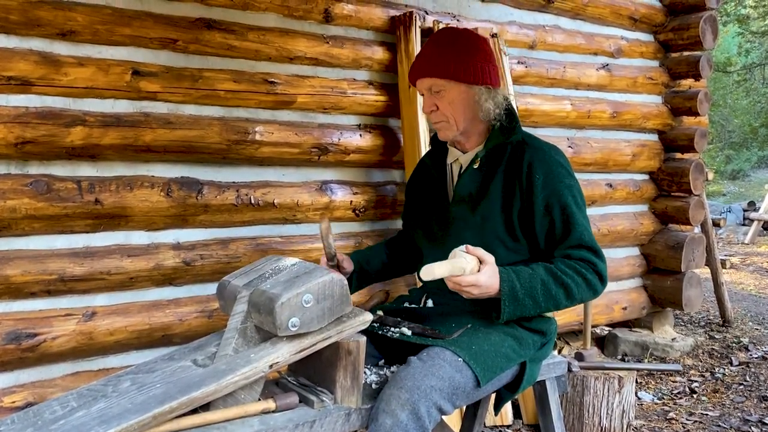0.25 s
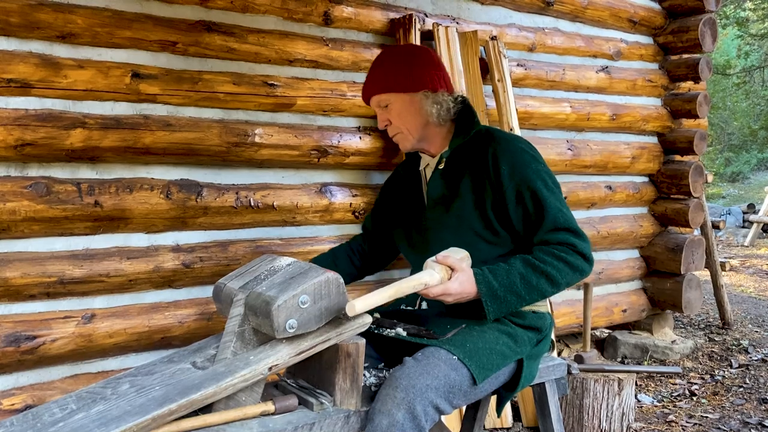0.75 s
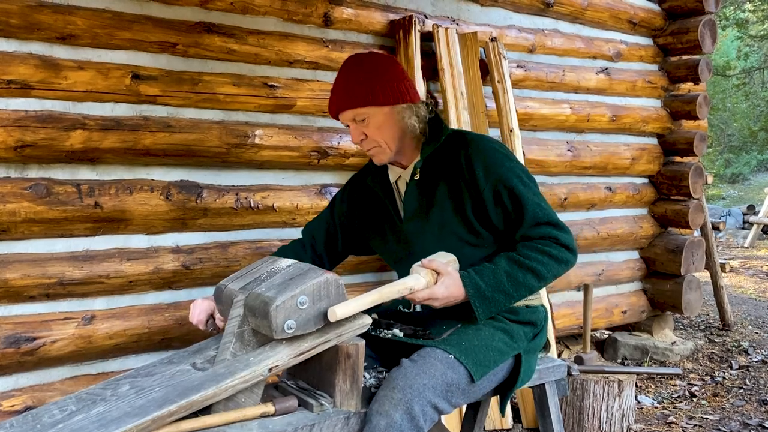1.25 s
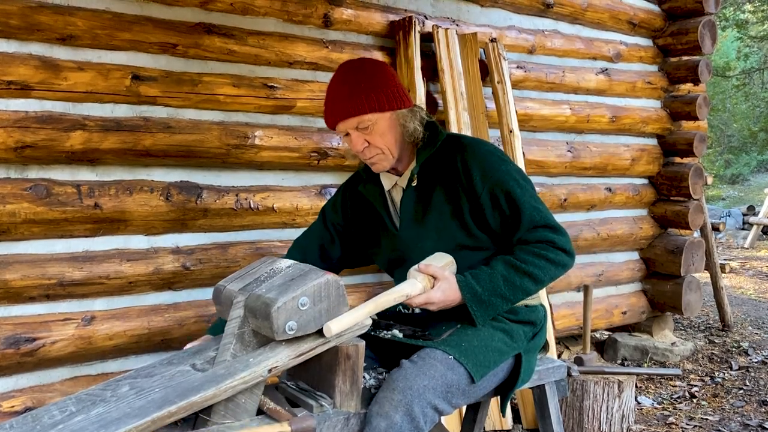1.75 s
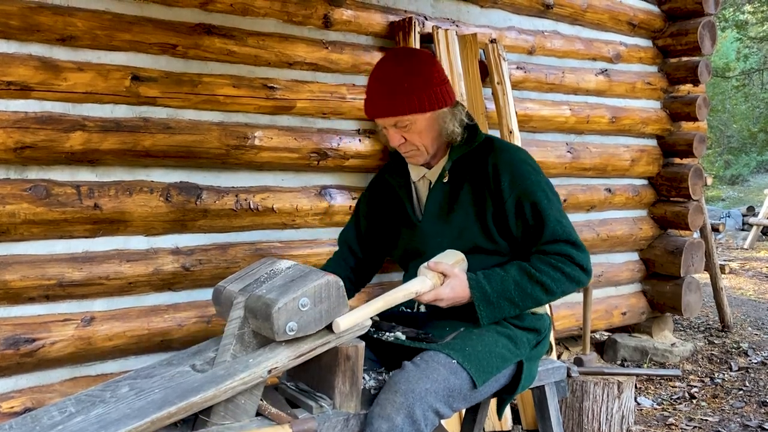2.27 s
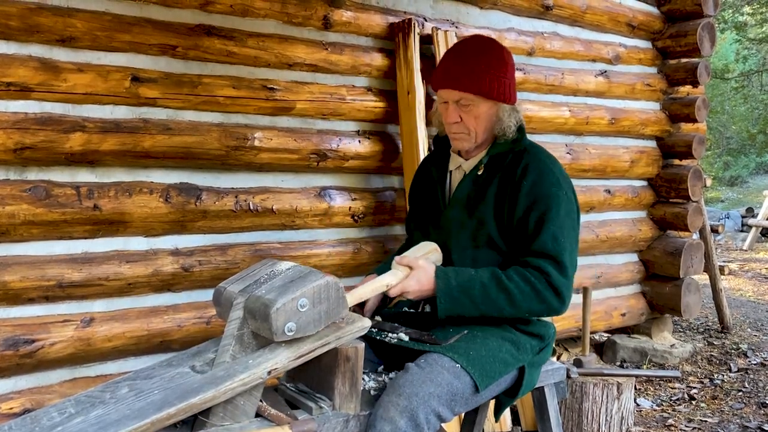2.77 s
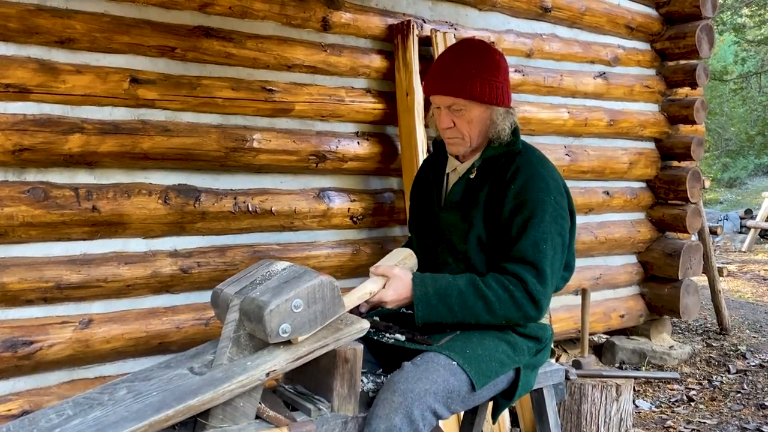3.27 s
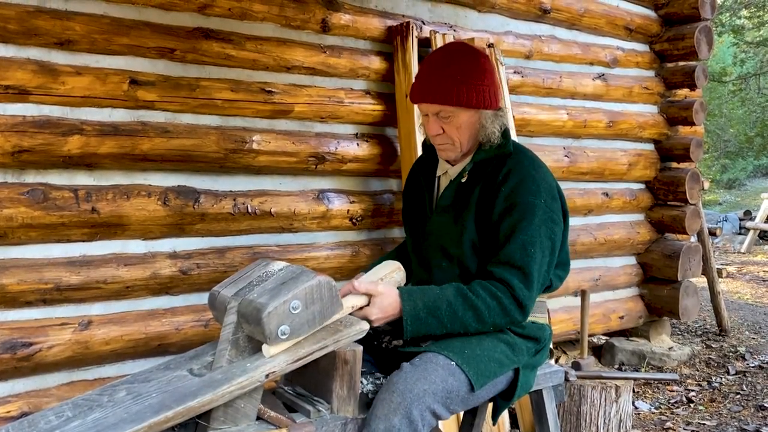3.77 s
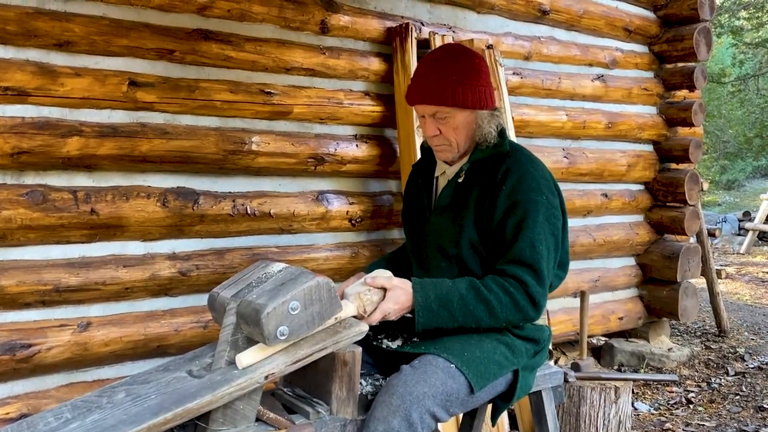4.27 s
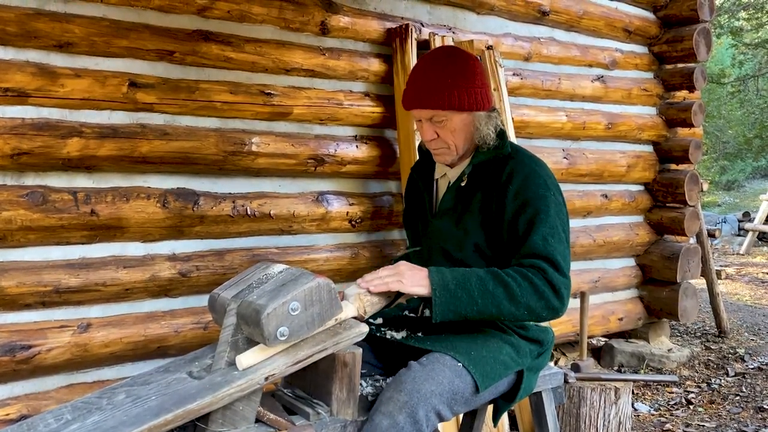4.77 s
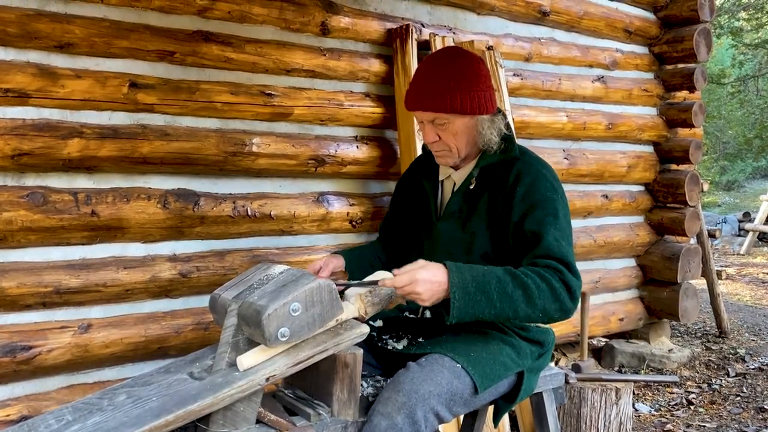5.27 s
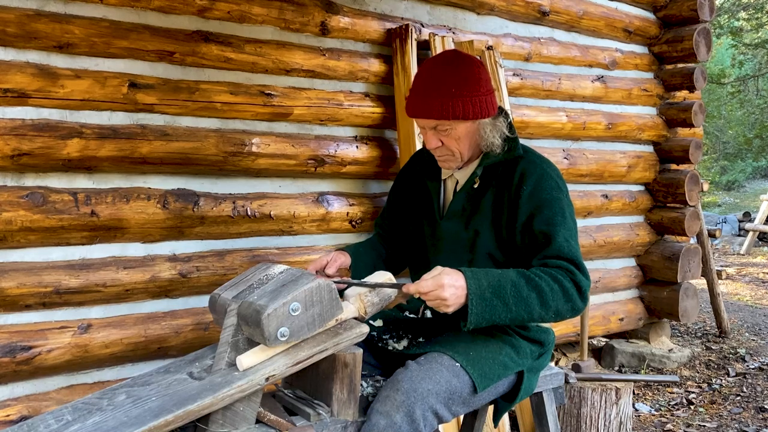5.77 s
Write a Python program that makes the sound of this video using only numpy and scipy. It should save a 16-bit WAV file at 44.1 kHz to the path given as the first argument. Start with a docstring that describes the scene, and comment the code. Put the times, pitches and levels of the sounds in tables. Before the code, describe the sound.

A wooden mallet clatters down among sticks, a billet slides and knocks under a wooden clamp, then a drawknife scrapes lightly, outdoors in quiet air.

```python
"""Woodwork at a shaving horse by a log wall, outdoors: a mallet clatters to rest among sticks and tools,
a billet is slid under the clamp head, then a drawknife scrapes in light strokes.
Blows are ringing pitches over a dense crowd of short ones; rubbing is uneven noise through wood resonances.
Loose sleeves brush, a blade rings faintly, and behind lie quiet air and one thin whistle made of a
wavering sine. The log wall adds a short scattered answer to the work."""
import sys
import numpy as np
from scipy import signal
from scipy.fft import rfft, irfft, next_fast_len
from scipy.io import wavfile
from scipy.ndimage import uniform_filter1d, map_coordinates

SR = 44100
rng = np.random.default_rng(int(sys.argv[2]) if len(sys.argv) > 2 else 0)


def unload_audio(sound):
    """Save the sound as a 16-bit wav file, at the path given as the first command line argument."""
    columns = np.transpose(np.atleast_2d(sound))
    # keep every value between -1 and 1, then stretch to whole-number steps
    steps = np.round(np.clip(columns, -1, 1) * 32767)
    wavfile.write(sys.argv[1], SR, steps.astype(np.int16))


N = 265923  # length in samples
T = np.arange(N) / SR  # time of each sample, s


def amp(db):
    """Turn decibels into a gain."""
    return 10 ** (np.asarray(db) / 20)


def unit(x):
    """Scale x to an rms of 1."""
    return x / np.sqrt(np.mean(x ** 2) + 1e-20)


def curves(rows):
    """Draw one smooth-running value per sample for each column after the time."""
    s, *columns = np.transpose(rows)
    return [np.interp(T, s, column) for column in columns]


def during(rows):
    """Give 1 while a curve lasts and 0 elsewhere, with soft ends."""
    inside = (T >= rows[0][0]) & (T <= rows[-1][0])
    return uniform_filter1d(1.0 * inside, size=400)


def wobble(rate):
    """Draw a smooth random curve with `rate` knots a second."""
    knots = rng.standard_normal(int(N * rate / SR) + 4)
    return map_coordinates(knots, [T * rate])


def filtered(x, response):
    """Multiply the spectrum of x by a response that depends on frequency."""
    m = next_fast_len(len(x) + 8192)
    hz = np.fft.rfftfreq(m, 1 / SR)
    return irfft(rfft(x, m) * response(hz), m)[:len(x)]


def coloured(x, spectrum):
    """Shape x through (pitch_hz, level_db) points, then bring it to rms 1."""
    points_hz, points_db = np.transpose(spectrum)

    def response(hz):
        return amp(np.interp(np.log(hz + 1), np.log(points_hz + 1), points_db))

    return unit(filtered(x, response))


def resonate(x, peaks):
    """Send x through parallel resonances with alternating signs."""
    def response(f):
        total = 0
        for k, (centre, width, db) in enumerate(peaks):
            resonance = 1j * f * width / (centre * centre - f * f + 1j * f * width)
            total = total + (-1) ** k * amp(db) * resonance
        return total

    return filtered(x, response)


def band(x, lo_hz, hi_hz):
    """Keep the range between two pitches, using only past samples."""
    edges = [lo_hz, min(hi_hz, SR / 2 - 1)]
    return signal.sosfilt(signal.butter(3, edges, "bandpass", fs=SR, output="sos"), x)


def add(track, s, sound):
    """Mix a sound into the track at time s."""
    part = track[max(round(s * SR), 0):][:len(sound)]
    part += sound[:len(part)]


def crowd_of_modes(t, count):
    """Sum many weak ringing pitches with random pitches, strengths and phases."""
    lines = np.zeros(len(t) // 2 + 1, complex)
    places = rng.integers(1, len(lines), count)
    lines[places] = rng.standard_normal(count) * np.exp(2j * np.pi * rng.random(count))
    return unit(irfft(lines, len(t)))


def contact(db, weight_db, bright_db, rap_db):
    """Set the four register levels: a heavy blow adds bass, a hard one tilts up the mids and treble."""
    return db + np.array([weight_db, 0, bright_db / 2 + rap_db, bright_db])


# The four registers of a blow, from bass to treble: low_hz, high_hz
REGISTERS = [(60, 250), (250, 600), (600, 1400), (1400, 17000)]


def blow(modes, spectrum, levels_db, rise, t60, ring_db, hold, treble_damping):
    """Strike wood: clear pitches ring over a crowd of short ones, and the contact drives each register."""
    t = np.arange(SR // 4) / SR
    head = slice(0, SR // 50)  # the first 20 ms set the loudness
    ring = 0
    for hz, db, life in modes:
        decay = amp(db + rng.normal(0, 1) - 60 * t / life)
        ring = ring + decay * np.sin(2 * np.pi * (hz * t + rng.random()))
    # a first sharp crack, then the parts chatter against each other for a moment and ring freely
    chatter = rng.standard_normal(len(t)) * (amp(-200 * t) + 2.2 * np.exp(-t / .0012))
    crowd = coloured(chatter + .7 * crowd_of_modes(t, count=600), spectrum)
    crowd = crowd * amp(-60 * np.maximum(t - hold, 0) / t60)
    # the range above about 4 kHz dies away faster, by treble_damping dB per s
    treble = filtered(crowd, lambda hz: 1 / (1 + (4000 / (hz + 1)) ** 4))
    crowd = crowd - treble * (1 - amp(-treble_damping * t))
    sound = crowd / crowd[head].std() + amp(ring_db) * ring / ring[head].std()
    sound = sound * (1 - np.exp(-t / max(rise, 1e-4)))
    parts = [band(sound, lo, hi) for lo, hi in REGISTERS]
    return sum(amp(db) * part / part[head].std() for db, part in zip(levels_db, parts))


def pushes(rows, shape):
    """Draw a gain curve per level column: each push takes hold, changes steadily to its level, lets go."""
    attack_s, swell_db_per_s, release_s = shape
    power = 0
    for start, length, *levels_db in rows:
        t = np.maximum(T - start, 0)
        swell_db = swell_db_per_s * np.minimum(t - length, 0)
        release_db = -60 * np.maximum(t - length, 0) / release_s
        course = (1 - np.exp(-t / attack_s)) * amp(swell_db + release_db)
        power = power + np.outer(amp(levels_db), course) ** 2
    return np.sqrt(power)


def friction(gains, spectrum, peaks, ring_db, judder_db, wander_db):
    """Rub wood: its fibres catch and let go unevenly, and shake the wood's resonances."""
    low, high = gains
    force = rng.standard_normal(N) * amp(judder_db * (wobble(60) + wobble(400)))
    # the contact point travels, so it favours now one set of resonances, now another
    ring = sum(amp(wander_db * wobble(25)) * resonate(force, peaks[k::3]) for k in range(3))
    sound = coloured(force, spectrum) + amp(ring_db) * unit(ring)
    return low * unit(band(sound, 149, 1520)) + high * unit(band(sound, 1116, 15000))


def tone(rows, waver):
    """Sing one thin tone that is unsteady in pitch and level."""
    hz, db = curves(rows)
    phase = 2 * np.pi * np.cumsum(hz * (1 + waver * wobble(300))) / SR
    return during(rows) * amp(db + 3.0 * wobble(37.0)) * unit(np.sin(phase))


# Dull blows on the bench, levels before the trim; bass and treble are relative to level_db:
# start_s, level_db, bass_weight_db, brightness_db, decay_60db_s
BENCH_BLOWS = [(0, -26.5, -10, -18.5, 0.18), (1.0018, -17, -9.5, -23, 0.059), (1.043, -33, -5, -29, 0.16),
               (1.149, -35.5, -16, -34, 0.2), (1.451, -37, -27, -33, 0.33), (2.569, -33, -8, -27, 0.097),
               (2.683, -29.5, -10.5, -37, 0.067), (2.698, -28.5, -10.5, -26.5, 0.18),
               (2.741, -41.5, -5, -9, 0.43), (3.057, -37, -19, -16, 0.091), (3.074, -39, -19, -28, 0.32),
               (3.139, -23.5, -18, -17.5, 0.083), (3.151, -25.5, -15, -25, 0.096),
               (3.166, -34, -6, -20, 0.31), (3.508, -41.5, -9.5, -9.5, 0.37), (4.129, -37, -8, -15.5, 0.33),
               (4.18, -48, -3, -26, 0.51), (4.238, -48, 0.5, -24, 0.11), (4.524, -46.5, -3, -15.5, 0.087),
               (4.924, -57.5, 10, -13, 0.046), (5.422, -48, -12.5, -12, .15)]
# Ringing pitches of the plank: pitch_hz, level_db, decay_60db_s (at longest)
BENCH_MODES = [(165, -10, .13), (285, -8, .11), (330, 0, .12), (365, -6, .1), (413, 0, .13), (455, -8, .1),
               (580, -17, .11), (700, -15, .12), (975, -8, .09), (1170, -15, .09), (2760, -22, .09)]
# Crowd of short pitches in a dull body: pitch_hz, level_db_per_hz
DULL_CROWD = [(40, -31), (80, -9), (200, -9), (390, -7), (580, -14.5), (1000, -8.5), (1350, -22),
              (2800, -23.5), (4300, -25.5), (8400, -41.5), (15000, -66)]


def bench_knocks():
    """The billet and the clamp head knock on the heavy plank, which answers softly."""
    out = np.zeros(N)
    for s, db, weight_db, bright_db, t60 in BENCH_BLOWS:
        levels_db = contact(db, weight_db, bright_db, rap_db=1)
        # a billet that stays pressed down damps the plank
        modes = [(hz, level, min(life, t60)) for hz, level, life in BENCH_MODES]
        add(out, s, blow(modes, DULL_CROWD, levels_db, rise=.0025, t60=t60,
                         ring_db=-1.5, hold=0.017, treble_damping=110))
    return amp(-1.5) * out


# Colour of the forest air: pitch_hz, level_db_per_hz
AIR_COLOUR = [(15, -39.5), (25, -16.5), (92, 0), (185, -8.5), (263, -8), (489, -16), (988, -19.5),
              (1190, -24.5), (2000, -26.5), (4030, -25), (16000, -32.5)]


def forest_air():
    """Soft, nearly steady air: coloured noise whose level drifts slightly."""
    level_db = -53 + 0.47 * wobble(5.0)
    return amp(level_db) * coloured(rng.standard_normal(N), AIR_COLOUR)


# Jogs of the steel blade: start_s, level_db (peak), decay_60db_s
BLADE_CHINKS = [(.062, -50, .15), (1.07, -51, .15), (1.345, -44, .65)]


def steel_blade():
    """A jogged blade rings on in one high mode."""
    out = np.zeros(N)
    t = np.arange(SR // 2) / SR
    for s, db, t60 in BLADE_CHINKS:
        add(out, s, amp(db - 60 * t / t60) * np.sin(2 * np.pi * 3530 * t))
    return out


# Brushes of the woollen sleeves: start_s, length_s, level_db
SLEEVE_BRUSHES = [(.275, 0.014, -56), (.39, 0.12, -61), (1.06, 0.01, -51), (4.28, 0.18, -59),
                  (4.793, 0.017, -52.5), (4.89, 0.092, -54.5)]
# Course of each brush: attack_s, swell_db_per_s, release_60db_s
SLEEVE_SHAPE = (0.01, 43, 0.15)
# Colour of the wool: pitch_hz, level_db_per_hz
WOOL_COLOUR = [(1000, -9), (3000, -1), (5500, 6), (8000, -3), (15000, -21)]


def sleeves():
    """Woollen sleeves brush: soft noise with an uneven level."""
    gain = pushes(SLEEVE_BRUSHES, SLEEVE_SHAPE)[0]
    return gain * amp(2.4 * wobble(50)) * coloured(rng.standard_normal(N), WOOL_COLOUR)


# Hard blows of wood on wood, levels before the trim; treble is relative to level_db:
# start_s, level_db, brightness_db, decay_60db_s (of the crowd), what_rings
WOOD_CLACKS = [(0.8927, -39.5, -5.5, 0.13, "billet"), (1.009, -25.5, -9, 0.024, "billet"),
               (1.0195, -32, -11, 0.034, "billet"), (1.342, -30, 6, 0.18, "handle"),
               (1.4906, -17.5, 9.5, 0.17, "mallet"), (1.57, -32.5, -11.5, 0.1, "mallet"),
               (1.596, -40, 0, .04, "stick"), (1.626, -33.5, -9.5, 0.097, "mallet"),
               (1.6321, -33, 8.5, 0.064, "stick"), (1.644, -29.5, -3, 0.072, "stick"),
               (1.657, -23, -20, 0.2, "stick"), (1.682, -34, -10.5, 0.23, "mallet"),
               (1.7291, -25, -9, 0.18, "mallet"), (1.746, -22.5, -21.5, 0.28, "mallet"),
               (1.765, -34.5, -10, .15, "mallet"), (1.7823, -29, 12, 0.14, "stick"),
               (1.794, -29, 4.5, 0.16, "stick"), (1.861, -31, -15, 0.08, "mallet"),
               (1.882, -36, -26, 0.076, "mallet"), (3.643, -31.5, -11.5, 0.08, "clamp"),
               (3.656, -24.5, -13, 0.15, "clamp"), (3.668, -30.5, -2, 0.2, "clamp")]
# How each body takes a blow, by name: mids_lift_db, bass_weight_db, rise_s
BODY_TOUCH = {"mallet": (5.8, -9.5, 0.0011), "handle": (4, -7.5, .003), "stick": (.5, -7.5, .0004),
              "clamp": (2.2, -3.5, 0.00033), "billet": (7.7, -5.5, 0.0011)}
# Ringing pitches of mallet, tool handle, stick, clamp head and unclamped billet:
# pitch_hz, level_db (varied a little at each blow), decay_60db_s
MALLET_MODES = [(248, -17, .25), (340, -12, .09), (420, -9, .1), (490, -13, .12), (580, -16, .12),
                (679, -10, .14), (759, -17, .13), (970, 1, .12), (1022, -3, .1), (1181, -3, .14),
                (2055, -6, .12), (2301, -5, .14), (2705, -9, .15), (2901, -5, .1), (3250, -7, .06),
                (3940, -11, .17), (4699, -7, .1), (5270, -4, .05), (5480, 0, .04), (6126, -5, .05),
                (6821, -13, .11)]
HANDLE_MODES = [(694, -1, .1), (1044, -9, .11), (1200, -7, .1), (1820, -6, .1), (2067, -9, .08),
                (2735, -9, .14), (3235, -8, .1), (3833, -8, .12), (4150, -5, .07), (5150, -17, .15),
                (5500, -11, .05)]
STICK_MODES = [(587, -7, .12), (689, -7, .09), (1035, -9, .12), (2056, -11, 0.08), (2283, -12, .07),
               (2880, -11, .11), (3063, -3, .06), (3273, -7, .08), (3472, -1, .08), (3700, -6, .04),
               (3957, -6, .09), (4075, -4, .09), (4468, -12, .09), (5150, -14, .08), (5426, -13, .08),
               (6401, -18, .12), (7380, -22, .1), (9250, -24, .12)]
CLAMP_MODES = [(85, -8, .1), (165, -7, .08), (300, -3, .08), (450, 0, .08), (610, -5, .08), (745, -11, .3),
               (980, -8, .06), (1690, -22, .1), (2770, -20, .13), (3450, -22, .07), (3960, -20, .07),
               (6450, -27, .08), (8600, -29, .1)]
BILLET_MODES = [(440, -5, .05), (680, -8, .04), (979, -4, .06), (1036, 0, .07), (1190, -4, .06),
                (2230, -12, .05)]
# Crowds of short pitches in hard bodies, slim sticks and the unclamped billet: pitch_hz, level_db_per_hz
HARD_CROWD = [(100, -34.5), (200, -8.5), (680, -10), (1000, -7.5), (1570, -16), (2090, -11.5), (2530, -16),
              (2840, -13.5), (4000, -9), (5500, -15), (9200, -20), (12500, -44), (16000, -45.5)]
SLIM_CROWD = [(100, -11), (170, -1), (643, -10), (1080, -9), (1510, -13.5), (2090, -15), (2480, -16.5),
              (2950, -7.5), (3990, -15), (4740, -11.5), (9220, -35), (16000, -56)]
BILLET_CROWD = [(80, -16), (390, -5), (1000, -4), (1400, -15), (2200, -11), (4300, -22), (8400, -57),
                (15000, -70)]


def clacks():
    """The billet raps the clamp; a tool's handle knocks the bench; the mallet drops on sticks; later the clamp
    shuts."""
    bodies = {
        "mallet": (MALLET_MODES, HARD_CROWD),
        "handle": (HANDLE_MODES, HARD_CROWD),
        "stick": (STICK_MODES, SLIM_CROWD),
        "clamp": (CLAMP_MODES, DULL_CROWD),
        "billet": (BILLET_MODES, BILLET_CROWD),
    }
    out = np.zeros(N)
    for s, db, bright_db, t60, name in WOOD_CLACKS:
        rap_db, weight_db, rise = BODY_TOUCH[name]
        levels_db = contact(db, weight_db, bright_db, rap_db)
        add(out, s, blow(*bodies[name], levels_db, rise, t60, ring_db=5, hold=.011, treble_damping=200))
    return amp(-3.5) * out


# Path of the whistle: time_s, pitch_hz, level_db
WHISTLE_PATH = [(.9, 4330, -66), (.97, 4210, -66), (1.18, 4080, -70), (1.3, 3870, -76)]


def far_whistle():
    """A faint, far whistle: one thin tone that falls in pitch."""
    return tone(WHISTLE_PATH, waver=0.0074)


# The mallet rocks over the sticks, levels before the trim: start_s, length_s, rumble_db, rasp_db
MALLET_ROCKS = [(1.53, 0.1, -47, -45), (1.63, 0.025, -32.5, -33), (1.68, 0.094, -43, -46),
                (1.83, 0.046, -47, -49)]
# Course of each rock: attack_s, swell_db_per_s, release_60db_s
MALLET_ROCK_SHAPE = (0.0063, 10, 0.14)


def rocking_mallet():
    """The mallet rolls over the sticks, and the friction shakes the resonances of both."""
    # a mode's width in Hz follows from its decay time
    peaks = [(hz, np.log(1000) / np.pi / t60, db)
             for hz, db, t60 in [*MALLET_MODES, *STICK_MODES] if hz < 5000]
    gains = pushes(MALLET_ROCKS, MALLET_ROCK_SHAPE)
    return amp(5.5) * friction(gains, HARD_CROWD, peaks, ring_db=4, judder_db=3, wander_db=3.5)


# Thin tones of the rocking mallet, one path each: first a squeak, then a high mode of the mallet that swells:
# time_s, pitch_hz, level_db
SQUEAK_PATHS = [
    [(1.597, 2850, -49), (1.607, 2965, -38), (1.628, 2960, -40.5), (1.641, 2945, -43), (1.665, 3000, -46)],
    [(1.638, 3900, -42), (1.666, 3957, -34.5), (1.7, 3880, -67)],
]


def mallet_squeaks():
    """The rocking mallet squeaks on the sticks, then one of its high modes swells: thin, gliding tones."""
    return sum(tone(rows, waver=0.014) for rows in SQUEAK_PATHS)


# The billet is shoved through hand and clamp, levels before the trim: start_s, length_s, rub_db, hiss_db
BILLET_SHOVES = [(2.11, 0.35, -43.5, -51.5), (2.74, 0.064, -49.5, -53.5), (2.9, 0.037, -44, -49.5),
                 (3.03, 0.089, -45.5, -53.5), (3.115, 0.099, -43, -46.5), (3.43, 0.11, -47.5, -48.5),
                 (3.56, 0.15, -42.5, -50), (3.88, 0.15, -56, -56.5), (4.05, 0.063, -48, -48),
                 (4.82, 0.16, -56, -74)]
# Its end catches on the plank with a short scuff, levels before the trim:
# start_s, length_s, rub_db, hiss_db
BILLET_SCUFFS = [(2.48, 0.013, -41, -44.5), (2.567, 0.011, -43, -39.5), (2.68, 0.021, -61, -46.5),
                 (3.117, 0.021, -35, -44), (4.123, 0.013, -50, -42)]
# Course of each shove and of each scuff: attack_s, swell_db_per_s, release_60db_s
BILLET_SHOVE_SHAPE = (.016, 30, .26)
BILLET_SCUFF_SHAPE = (0.00044, 0, 0.054)
# Colour of the rubbing: pitch_hz, level_db_per_hz
RUB_COLOUR = [(88, -54), (150, 8.5), (410, -9), (860, -2.5), (964, -65), (1280, -9), (4230, -24),
              (5120, -17), (14000, -43)]
# Resonances of the loose billet: pitch_hz, width_hz, level_db
BILLET_PEAKS = [(400, 150, -2), (540, 70, -7), (1000, 110, -2), (1530, 70, -12), (2760, 200, -7),
                (3300, 200, -11), (4250, 300, -13)]


def sliding_billet():
    """The billet rubs and scuffs along the bench, shaking its own resonances."""
    shoves = pushes(BILLET_SHOVES, BILLET_SHOVE_SHAPE)
    scuffs = pushes(BILLET_SCUFFS, BILLET_SCUFF_SHAPE)
    gains = np.hypot(shoves, scuffs)
    return amp(-1.5) * friction(gains, RUB_COLOUR, BILLET_PEAKS, ring_db=2.5, judder_db=2.2, wander_db=2.5)


# The billet grinds under the clamp head: start_s, length_s, groan_db, whine_db
CLAMP_GRINDS = [(3.44, 0.11, -55.5, -53.5), (4.038, 0.028, -49, -48.5), (4.072, 0.034, -42, -52.5),
                (4.11, 0.072, -63, -63)]
# Course of each grind: attack_s, swell_db_per_s, release_60db_s
CLAMP_GRIND_SHAPE = (.006, 9.7, 0.069)
# Resonances of the pinched billet: pitch_hz, width_hz, level_db
PINCHED_PEAKS = [(786, 65, -6), (975, 60, 0), (4230, 100, -6)]


def grinding_clamp():
    """The billet grinds under the clamp head, and its pinched resonances stand out strongly."""
    gains = pushes(CLAMP_GRINDS, CLAMP_GRIND_SHAPE)
    return friction(gains, RUB_COLOUR, PINCHED_PEAKS, ring_db=12, judder_db=1.5, wander_db=1.5)


# Drawknife strokes, levels before the trim: start_s, length_s, wood_db, edge_db
KNIFE_STROKES = [(5.505, 0.245, -45.5, -56), (5.79, 0.093, -43, -55.5), (5.97, 0.084, -49, -71)]
# Course of each stroke: attack_s, swell_db_per_s (below zero: it fades), release_60db_s
KNIFE_SHAPE = (0.061, -7, 0.11)
# Colour of the scrape: pitch_hz, level_db_per_hz
SCRAPE_COLOUR = [(150, 6), (330, -10), (620, -17), (950, -13), (1200, 10), (1500, 4), (4400, -26),
                 (12000, -32), (16000, -61)]
# Resonances of the clamped billet: pitch_hz, width_hz, level_db
CLAMPED_PEAKS = [(336, 105, -7), (843, 59, -1), (1020, 87, -2.5), (1170, 180, -5), (3000, 180, -14),
                 (4400, 590, -14.5)]


def drawknife():
    """The edge skims the clamped billet, which answers most strongly near one kilohertz."""
    gains = pushes(KNIFE_STROKES, KNIFE_SHAPE)
    return amp(-1.0) * friction(gains, SCRAPE_COLOUR, CLAMPED_PEAKS, ring_db=8, judder_db=.8, wander_db=1.2)


def log_wall(x, t60):
    """The round logs scatter a short answer: a fading noise tail that starts after 8 ms."""
    t = np.arange(SR // 2) / SR
    tail = band(rng.standard_normal(len(t)), 130, 4300) * amp(-60 * t / t60) * (t > .008)
    return signal.fftconvolve(x, tail / np.linalg.norm(tail))[:N]


def scene():
    """Mix all the work, its answer from the wall, and the forest."""
    mallet = clacks() + rocking_mallet() + mallet_squeaks()
    billet = sliding_billet() + grinding_clamp()
    work = bench_knocks() + steel_blade() + sleeves() + mallet + billet + drawknife()
    forest = forest_air() + far_whistle()
    return (work + amp(-20.5) * log_wall(work, t60=0.15) + forest)[None]


def record(dry):
    """Round off the loudest peaks smoothly and keep nothing from 15850 Hz up."""
    rounded = dry[0] / (1 + np.abs(dry[0] / 1.05) ** 6) ** (1 / 6)
    return filtered(rounded, lambda hz: hz < 15850)[None]


dry = scene()
out = record(dry)
unload_audio(out)
```